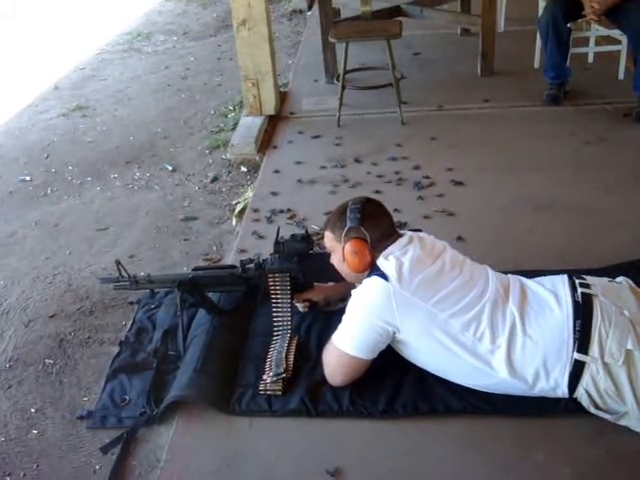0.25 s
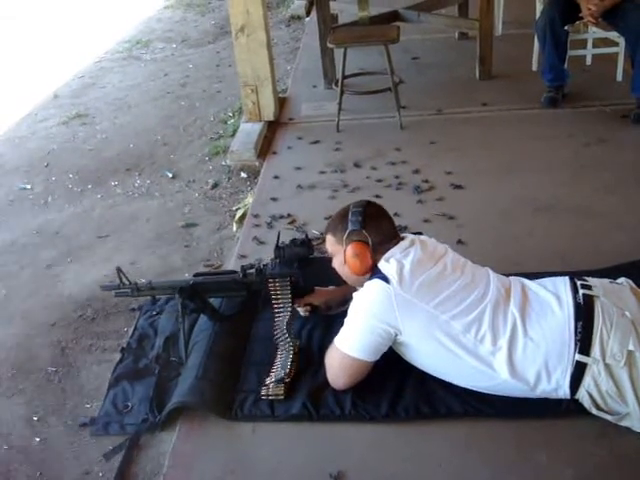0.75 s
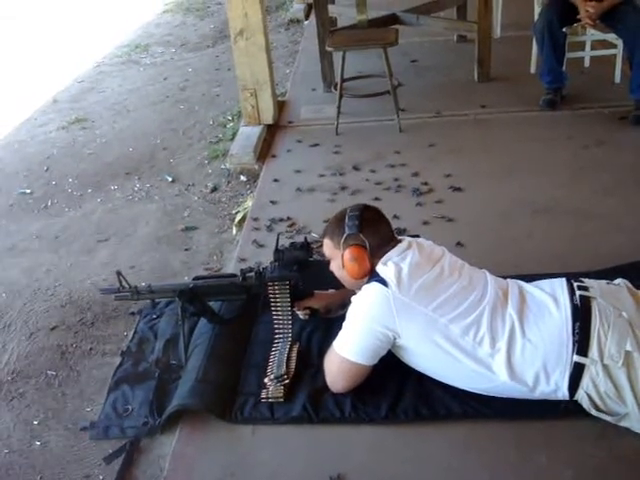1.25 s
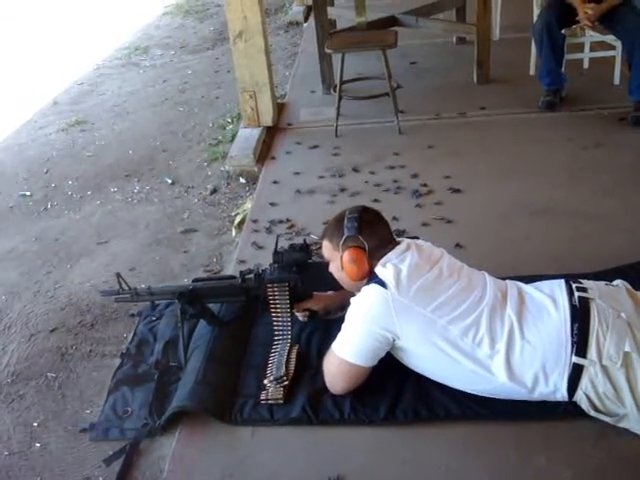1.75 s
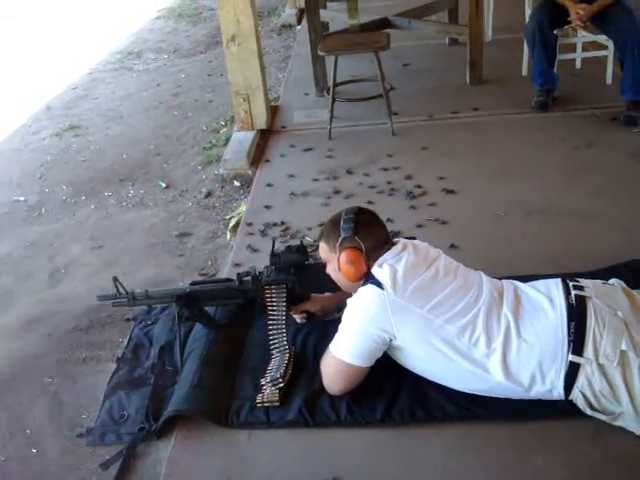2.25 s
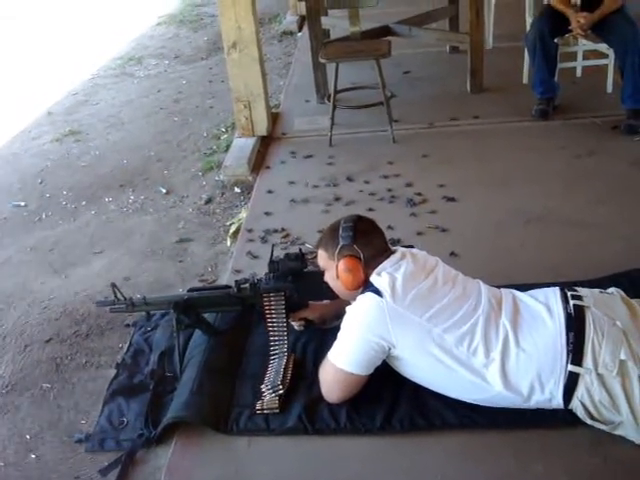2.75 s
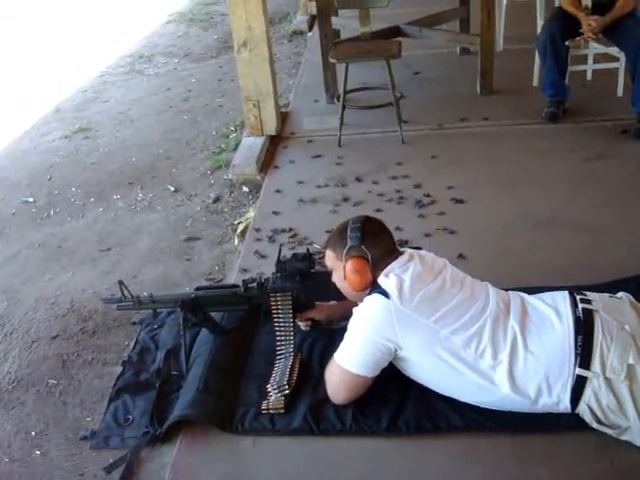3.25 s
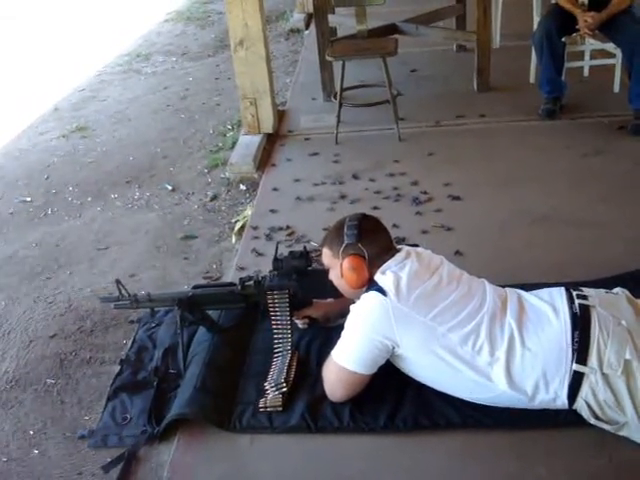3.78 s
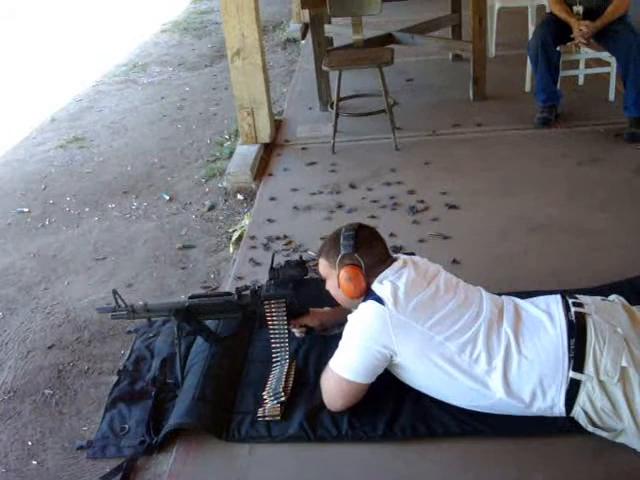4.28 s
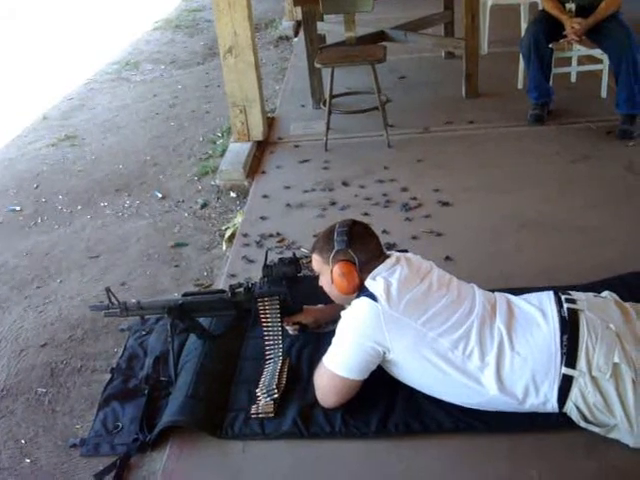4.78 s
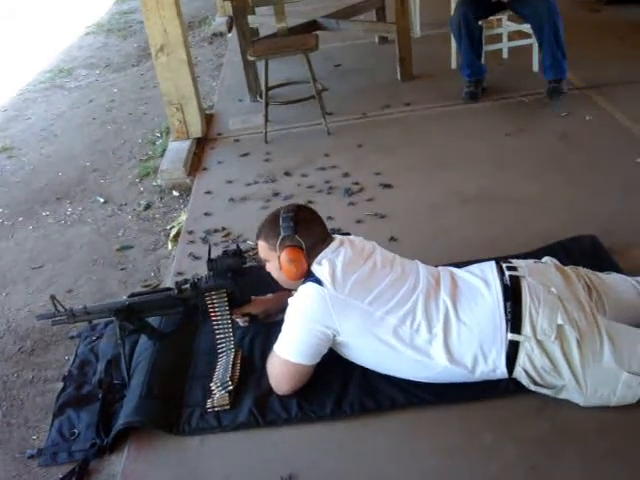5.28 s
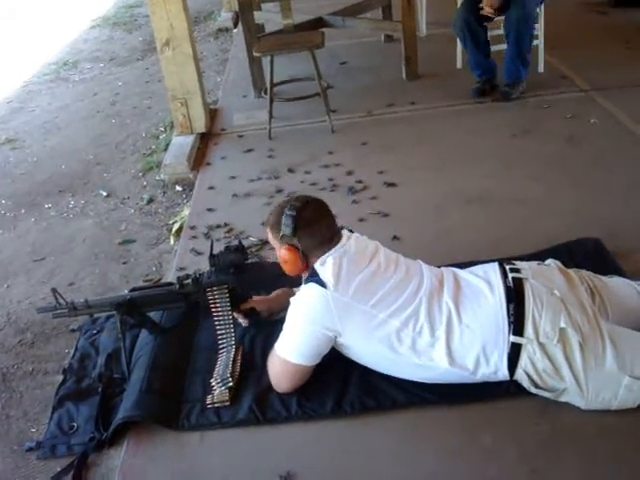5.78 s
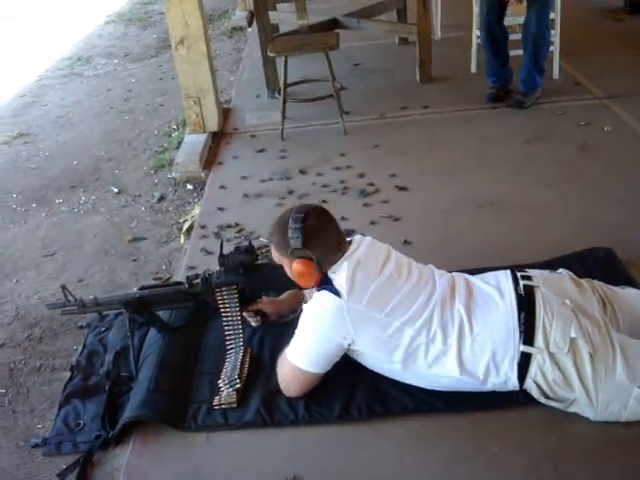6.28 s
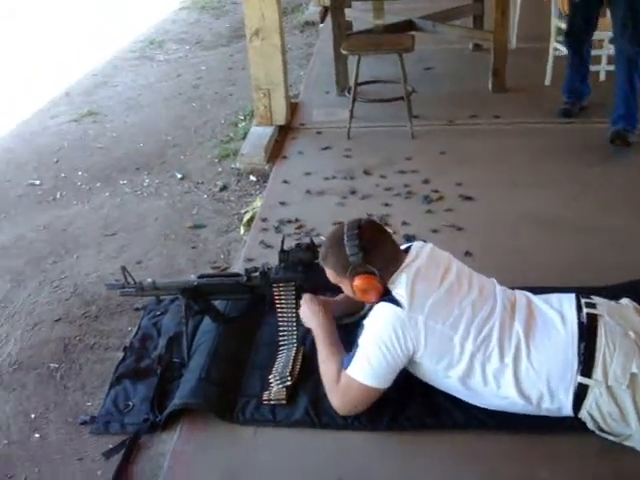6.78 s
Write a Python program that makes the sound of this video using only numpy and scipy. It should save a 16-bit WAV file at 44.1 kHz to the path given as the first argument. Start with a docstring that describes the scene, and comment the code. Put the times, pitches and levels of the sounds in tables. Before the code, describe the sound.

Already inside a ringing rifle blast, then a machine gun's bolt clacks and two fast rounds roar. Brass tinkles faintly; another rifle shot leads straight into a second two-round burst. More single rifle shots follow, with a dry bolt slam, thin distant pops and a final tiny metal ping. Covered shooting range, outdoor rush, small microphone saturating on blasts.

```python
"""A rifle blast is already breaking as we come in, ringing under the roof of a covered shooting range.
A belt-fed machine gun then fires two bursts of two rounds; later its bolt slams shut without a shot.
The rifle goes on with single shots, thin guns pop further off, spent brass tinkles, a belt link pings.
Blasts are overdriven pressure pulses, roars and echoes shaped noise, steel gritty noise, brass sines.
Shots roll away over an outdoor rush, and one small microphone saturates on the blasts."""
import sys
import numpy as np
from scipy import signal
from scipy.fft import rfft, irfft, next_fast_len
from scipy.io import wavfile
from scipy.ndimage import map_coordinates

SR = 44100
rng = np.random.default_rng(int(sys.argv[2]) if len(sys.argv) > 2 else 0)


def persist_wave(psi):
    """Save psi, clipped to +-1, as 16-bit WAV."""
    counts = np.round(np.clip(psi, -1, 1) * 32767).astype(np.int16)
    wavfile.write(sys.argv[1], SR, np.atleast_2d(counts).T)


N = 310023

# Colour tables set the balance within a sound; its loudness is set where it is mixed.

# trigger pulls: bolt released t/s, meets the belt t/s, locks t/s, rounds fired, far slope echoes level/dB
PULLS = [(.596, .642, .658, 2, 0), (2.213, 2.259, 2.276, 2, -4), (4.2802, 4.3233, 4.3508, 0, 0)]
# colour of the machine gun's roar under the roof: f/Hz, level/dB
GUN_COLOUR = [(24, -66), (40, -26), (180, -19.5), (237, -15), (354, -3.5), (422, -9), (790, 2.5),
              (1720, -1.5), (1900, -3.5), (2380, -4), (2770, -3.5), (9450, -20.5), (12100, -31),
              (14800, -34), (16000, -35)]
# how fast that roar dies: f/Hz, t60/s
GUN_DECAY = [(100, 0.12), (350, 0.84), (900, 0.4), (2500, 0.42), (6000, 0.49), (14000, 0.36)]
# from round to round, and from the muzzle to the bank and back
CYCLE_S, THUMP_S = .1148, .098
ROUND_DB, NEXT_ROUND_DB = 0, -3  # first round, then the step to each further one

# colour of steel on steel: f/Hz, level/dB
STEEL_COLOUR = [(120, -54), (200, -13), (401, -21.5), (612, -25), (763, -7.5), (1120, -4), (1270, -5.5),
                (1400, -6.5), (2910, -5.5), (4600, -6.5), (5230, -7.5), (7680, -11), (16000, -37.5)]
# contacts of the bolt: level/dB, rise/s, t60/s
SEAR = (-25, .00022, .022)
SLIDE = (-28, .002, .33)
FEED = (-19.5, .0003, .089)
STRIP = (-18.5, .002, .14)
LOCK = (-14.5, .00042, .047)
RECOIL = (-11.5, .00073, .11)

# colour of the range's answer to the machine gun: f/Hz, level/dB
GUN_ROLL_COLOUR = [(24, -66), (40, -38), (124, -29.5), (243, -11.5), (372, -9), (646, -14), (852, -2.5),
                   (1180, -3), (1950, -1.5), (3140, -6), (7930, -24), (9690, -22.5), (11800, -33),
                   (16000, -37)]
# backstop and hills answering each burst: delay t/s, level/dB, rise/s, t60/s
SLOPES = [(.505, -29, 0.011, 1.03), (.945, -31, 0.064, 1.57)]
# a burst rolls on over the open range
ROLL_DELAY_S, ROLL_DB, ROLL_RISE_S, ROLL_T60_S = .144, -28.5, .13, 3.64

# spent cases on the concrete: t/s, level/dB, low ring against high ring level/dB
CASES = [(1.534, -44, -25), (1.677, -46, -22), (1.81, -46, -25), (3.015, -56, 3), (3.098, -52.5, 3),
         (3.23, -54, 2), (3.294, -52.5, 3)]
# modes of a brass case: f/Hz, level/dB, t60/s
BRASS_MODES = [(4160, -1, .35), (5400, -4, .4), (5800, 0, 0.4), (5940, 3, .4), (7470, -5, 0.5),
               (8530, -8, .4), (9800, -0.5, 0.25), (9630, -6, 0.55)]
# handling: a steel tick (level/dB, rise/s, t60/s), then the ping of a belt link
TICK_S, TICK = 6.757, (-38, .0005, .025)
PING_S, PING_HZ, PING_DB, PING_T60_S = 6.795, 7704, -55, .23

# rifle shots: t/s, level/dB, share of the roof's answer that repeats from shot to shot (0-1)
RIFLE_SHOTS = [(-.052, 0, 0.44), (1.992, -0.5, 0.4), (3.571, 0, 0.55), (4.9768, 0.5, 0.8),
               (6.0795, 0, 0.11)]
# resonances of the shelter: f/Hz, width f/Hz, boost level/dB
SHELTER_MODES = [(473, 22, 6), (600, 18, 8), (637, 24, 7), (730, 16, 6), (786, 20, 6), (905, 20, 7),
                 (1153, 40, 8), (1415, 25, 5), (1604, 28, 6), (1734, 25, 4), (1828, 16, 6), (2406, 30, 5),
                 (2663, 20, 4)]
# colour of the rifle's ring under the roof: f/Hz, level/dB
RIFLE_COLOUR = [(40, -39), (190, -25.5), (270, -15.5), (450, -7.5), (620, 0), (1100, -2), (1500, -3.5),
                (2400, -3.5), (3200, -8), (5200, -11), (9600, -22.5), (12100, -29.5), (16000, -37.5)]
# how fast that ring dies: f/Hz, t60/s
RIFLE_DECAY = [(100, 0.51), (350, 0.38), (800, 0.48), (2200, 0.57), (5000, 0.67), (14000, 0.49)]
# posts and furniture scatter each rifle shot at random: range of delays, level
SCATTER_S, SCATTER_DB = (.004, .06), -8.5
# walls slap the rifle shot back: delay t/s
WALL_DELAYS_S = (.084, .1076, .12, .128, .188)
WALL_DB, WALL_DB_PER_S = 2.5, -77  # level at zero delay, loss per second of delay

# colour of dull, middle-register reflections and hollow knocks: f/Hz, level/dB
DULL_COLOUR = [(200, -46), (400, -19), (600, -4), (1200, 6), (2000, -22), (5000, -25), (16000, -52)]
# single banks throw the rifle's report back: delay t/s
BANK_DELAYS_S = (.187, .259, .31, .412, .495)
BANK_DB, BANK_DB_PER_S = -20, -13  # level at zero delay, loss per second of delay
# colour of the range's answer to the rifle: f/Hz, level/dB
RIFLE_ROLL_COLOUR = [(24, -65), (40, -23), (133, -44), (320, -38), (354, -7), (422, -48), (733, -3),
                     (942, 1), (1680, -5.5), (2260, -2.5), (11000, -29.5), (11800, -31.5), (14800, -35.5),
                     (16000, -41)]
# how fast that answer dies: f/Hz, t60/s
RIFLE_ROLL_DECAY = [(150, 1), (1000, 3.57), (2500, 2.18), (6000, 2.1), (14000, 2.4)]

# guns further down the line: t/s, ring level/dB, first crack above the ring level/dB, t60/s
FAR_SHOTS = [(4.668, -34, -1, 0.39), (4.869, -45.5, -10, 0.24), (5.698, -32.5, 5.5, 0.57)]
# colour of the far guns: f/Hz, level/dB
FAR_COLOUR = [(200, -17), (900, -28), (1600, 4.5), (3000, 3.5), (4700, 5.5), (6000, -9), (10000, -18.5),
              (16000, -29)]

# colour of the outdoor background: f/Hz, level/dB
AIR_COLOUR = [(18, -70), (30, -26), (86, -32), (170, -17.5), (295, -8.5), (526, -7), (760, 1), (1100, 1.5),
              (1590, -8.5), (2480, -13.5), (6380, -35.5), (11100, -28.5), (12000, -47), (13300, -36),
              (16000, -56)]
AIR_DB, AIR_DB_PER_S = -35.5, -.3365  # opening level and slow drift
# the background dips at each burst and rifle shot, holds, then comes back
BURST_DIP_DB, RIFLE_DIP_DB, DIP_HOLD_S, DIP_RECOVER_S = 12, 5, .63, .46
TOP_HZ = 16000  # band limit of the microphone


def machine_gun():
    """The muzzle points out of the shelter, so its roar swells in; a low thump returns from the bank."""
    out = np.zeros(N)
    thump = blast(push=.00082, low_hz=330, high_hz=800, drive_db=-8)
    roof = noise(GUN_COLOUR, SR)
    for s, db in fired():
        # half of the roof's answer repeats from round to round
        roar = unit(roof + noise(GUN_COLOUR, SR)) * clumps(rate=410, depth_db=1.3, size=SR)
        add(out, s, amp(db - 12) * fade(roar, GUN_DECAY, rise=.014, hold=.04))
        add(out, s + THUMP_S, -amp(db - 7.5) * thump)
        # the rough face of the bank smears part of the thump into a short growl
        growl = noise(DULL_COLOUR, SR // 4)
        add(out, s + THUMP_S, growl * envelope(growl, db - 17, rise=.0044, t60=.12))
    return out


def bursts():
    """The pulls that fire: (time of the first round s, rounds, level of the slope echoes dB)."""
    return [(lock, rounds, echo_db) for release, feed, lock, rounds, echo_db in PULLS if rounds]


def fired():
    """Every round of the machine gun: (s, level dB)."""
    shots = []
    for s, rounds, echo_db in bursts():
        for k in range(rounds):
            shots.append((s + k * CYCLE_S, ROUND_DB + k * NEXT_ROUND_DB))
    return shots


def bolt():
    """The bolt leaves the sear, slides, meets the belt and locks; live pulls strip a round and recoil."""
    out = np.zeros(N)
    for release, feed, lock, rounds, echo_db in PULLS:
        for s, contact in (release, SEAR), (release, SLIDE), (feed, FEED), (lock, LOCK):
            add(out, s, clash(*contact))
        add(out, lock, knock(db=-16, t60=.07))
        if rounds:
            add(out, feed, clash(*STRIP))
    for s, db in fired():
        add(out, s, clash(*RECOIL))
    # small steel parts radiate little bass
    return signal.sosfilt(signal.butter(1, 250, 'high', fs=SR, output='sos'), out)


def clash(db, rise, t60):
    """Steel on steel: a bright, gritty contact with a faint answer from the roof."""
    grit = noise(STEEL_COLOUR, SR // 3) * clumps(rate=730, depth_db=.5, size=SR // 3)
    contact = envelope(grit, db, rise, t60)
    answer = envelope(grit, db - 20, rise, t60=.3)
    return grit * (contact + answer)


def knock(db, t60):
    """The receiver answers a hard contact with a short, hollow body."""
    body = noise(DULL_COLOUR, SR // 5)
    return body * envelope(body, db, rise=.0036, t60=t60)


def returns():
    """Each burst rolls over the range and comes back from the far slopes."""
    out = np.zeros(N)
    for s, rounds, echo_db in bursts():
        add(out, s + ROLL_DELAY_S, swell(ROLL_DB, ROLL_RISE_S, ROLL_T60_S))
        for delay, db, rise, t60 in SLOPES:
            add(out, s + delay, swell(db + echo_db, rise, t60))
    return out


def swell(db, rise, t60):
    """A soft, lumpy echo of a burst: many scattered paths blur it into noise."""
    rush = noise(GUN_ROLL_COLOUR, 2 * SR) * clumps(rate=60, depth_db=1.5, size=2 * SR)
    return rush * envelope(rush, db, rise, t60)


def brass():
    """Empty cases bounce; each landing excites their modes in a different balance."""
    out, t = np.zeros(N), np.arange(SR // 2) / SR
    for s, db, low_db in CASES:
        for hz, mode_db, t60 in BRASS_MODES:
            tilt_db = along([(6000, low_db), (9500, 0)], hz)
            level = db + mode_db + tilt_db + rng.normal(0, 1.8)
            tuned_hz = hz * rng.normal(1, .0018)
            add(out, s, amp(level - 60 * t / t60) * np.sin(2 * np.pi * tuned_hz * t))
    return out


def handling():
    """The shooter handles the gun: a small steel tick, then the thin ring of a belt link."""
    out, t = np.zeros(N), np.arange(SR // 3) / SR
    add(out, TICK_S, clash(*TICK))
    add(out, PING_S, amp(PING_DB - 60 * t / PING_T60_S) * np.sin(2 * np.pi * PING_HZ * t))
    return out


def rifle():
    """Each shot: the direct blast, slaps off hard surfaces and the dense ring under the roof."""
    out = np.zeros(N)
    direct = 1.4 * blast(push=.00031, low_hz=510, high_hz=3000, drive_db=13)
    # only a trace of the deep pressure wave passes the microphone
    deep = amp(-44) * blast(push=.003, low_hz=28, high_hz=130, drive_db=0)
    slap = blast(push=.00035, low_hz=620, high_hz=3500, drive_db=0)
    roof = noise(RIFLE_COLOUR, SR, SHELTER_MODES)
    clusters = clumps(rate=220, depth_db=2.5, size=SR)
    for s, db, alike in RIFLE_SHOTS:
        fresh = noise(RIFLE_COLOUR, SR, SHELTER_MODES)
        ring = np.sqrt(alike) * roof + np.sqrt(1 - alike) * fresh
        add(out, s, amp(db - 10.5) * fade(ring * clusters, RIFLE_DECAY, rise=.0032, hold=.036))
        add(out, s, amp(db) * (direct + deep))
        # the first reflections make a short boom in the middle register
        boom = noise(DULL_COLOUR, SR, SHELTER_MODES)
        add(out, s, boom * envelope(boom, db - 12.5, rise=.0036, t60=.27))
        for delay in rng.uniform(*SCATTER_S, size=6):
            add(out, s + delay, amp(db + SCATTER_DB) * slap)
        for delay in WALL_DELAYS_S:
            add(out, s + delay, amp(db + WALL_DB + WALL_DB_PER_S * delay) * slap)
    return out


def claps():
    """Each rifle shot comes back several times as a dull clap, smeared by the slope of the banks."""
    out = np.zeros(N)
    for s, db, alike in RIFLE_SHOTS:
        for delay in BANK_DELAYS_S:
            clap = noise(DULL_COLOUR, SR // 5)
            level = db + BANK_DB + BANK_DB_PER_S * delay
            add(out, s + delay, clap * envelope(clap, level, rise=.0014, t60=.051))
    return out


def rifle_roll():
    """Banks and trees scatter each rifle shot into a long, uneven roll."""
    out = np.zeros(N)
    echo = fade(noise(RIFLE_ROLL_COLOUR, 2 * SR), RIFLE_ROLL_DECAY, rise=.055, hold=.16)
    for s, db, alike in RIFLE_SHOTS:
        add(out, s, amp(db - 27.5) * echo * clumps(rate=46, depth_db=1.1, size=2 * SR))
    return out


def far_shots():
    """Distant guns arrive thin: a small crack and its smeared ring."""
    out = np.zeros(N)
    for s, db, crack_db, t60 in FAR_SHOTS:
        pop = noise(FAR_COLOUR, SR)
        ring = envelope(pop, db, rise=.00059, t60=t60)
        crack = envelope(pop, db + crack_db, rise=.00059, t60=.065)
        add(out, s, pop * (ring + crack))
    return out


def background():
    """A steady outdoor rush, slowly sinking, that dips at each burst and rifle shot and creeps back."""
    air = noise(AIR_COLOUR, N)
    t = clock(air)
    reports = [(s, BURST_DIP_DB) for s, *_ in bursts()]
    reports += [(s, RIFLE_DIP_DB) for s, *_ in RIFLE_SHOTS]
    dips = []
    for s, depth in reports:
        recovery = np.clip(1 - (t - s - DIP_HOLD_S) / DIP_RECOVER_S, 0, 1)
        dips.append(depth * (t > s) * recovery)
    # where dips overlap, the deepest one counts
    return air * amp(AIR_DB + AIR_DB_PER_S * t - np.max(dips, axis=0))


def blast(push, low_hz, high_hz, drive_db):
    """A blast of peak 1: a steep push (s) and a longer suction, flattened by overload, bass stripped."""
    u = np.arange(SR // 20) / SR / push
    pressure = np.tanh(amp(drive_db) * (1 - u) * np.exp(-u))
    wave = signal.sosfilt(signal.butter(1, high_hz, fs=SR, output='sos'), pressure)
    wave = signal.sosfilt(signal.butter(2, low_hz, 'high', fs=SR, output='sos'), wave)
    return -wave / np.abs(wave).max()


def noise(spectrum, size, peaks=()):
    """Noise of rms 1 with a broad colour and narrow resonances, its phases random."""
    hz = np.fft.rfftfreq(size, 1 / SR)
    db = along(spectrum, hz)
    for centre, width, gain in peaks:
        db = db + gain / (1 + (2 * (hz - centre) / width) ** 2)
    phases = np.exp(2j * np.pi * rng.random(len(hz)))
    return unit(irfft(amp(db) * phases, size))


def fade(x, decay, rise, hold):
    """Reflections build up, stay dense for a while, then die at each frequency's own speed."""
    hz, t, z = signal.stft(x, SR, nperseg=256)
    loss_db = -60 * np.maximum(t - hold, 0) / along(decay, hz)[:, None]
    y = signal.istft(z * amp(loss_db), SR, nperseg=256)[1][:len(x)]
    return y * (1 - np.exp(-clock(y) / rise))


def envelope(x, db, rise, t60):
    """A gain for x: a quick build-up, then a decay of 60 dB in t60 seconds."""
    t = clock(x)
    return amp(db - 60 * t / t60) * (1 - np.exp(-t / rise))


def clumps(rate, depth_db, size):
    """A random gain of rms 1: reflections arrive in clusters, rate a second."""
    knots = rng.standard_normal(size)[:size // 8]
    wander = map_coordinates(knots, [np.arange(size) * rate / SR], order=1)
    return unit(amp(depth_db * wander))


def amp(db):
    """Decibels to gain."""
    return 10 ** (np.asarray(db) / 20)


def unit(x):
    """Scale to rms 1."""
    return x / np.sqrt(np.mean(x ** 2) + 1e-20)


def along(points, hz):
    """(Hz, value) points read on a log frequency axis."""
    f, v = np.transpose(points)
    return np.interp(np.log(hz + 1), np.log(f + 1), v)


def clock(x):
    """The time of each sample in seconds."""
    return np.arange(len(x)) / SR


def add(track, s, sound):
    """Mix a sound into the track from time s on; whatever falls outside the track is cut."""
    start = round(s * SR)
    part = sound[max(-start, 0):N - start]
    track[max(start, 0):][:len(part)] += part


def scene():
    """All the guns, their echoes and the open air at one microphone."""
    gun = machine_gun() + bolt() + returns() + brass() + handling()
    lane = rifle() + claps() + rifle_roll()
    return (gun + lane + far_shots() + background())[None]


def record(dry):
    """The microphone saturates on the blasts, dips near 12 kHz, lifts above that and has a band limit."""
    squashed = dry / (1 + np.abs(dry / 1.05) ** 6) ** (1 / 6)
    size = next_fast_len(N + SR // 2)
    hz = np.fft.rfftfreq(size, 1 / SR)
    # response: f/Hz, level/dB
    response = [(9600, -.5), (10400, -.5), (11200, -.5), (12200, -3), (13400, 8), (15500, 11)]
    colour = amp(along(response, hz)) * (hz < TOP_HZ)
    return irfft(rfft(squashed, size) * colour, size)[:, :N]


dry = scene()
out = record(dry)
persist_wave(out)
```